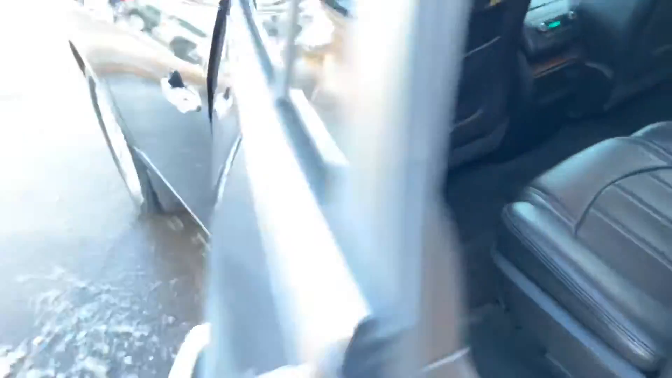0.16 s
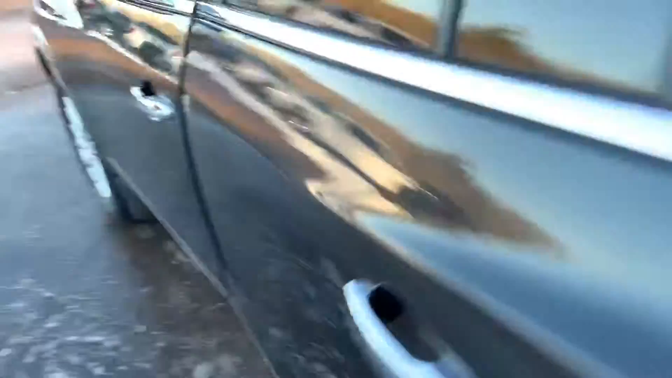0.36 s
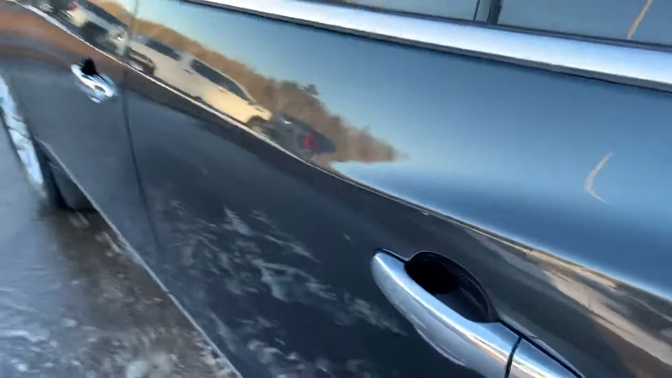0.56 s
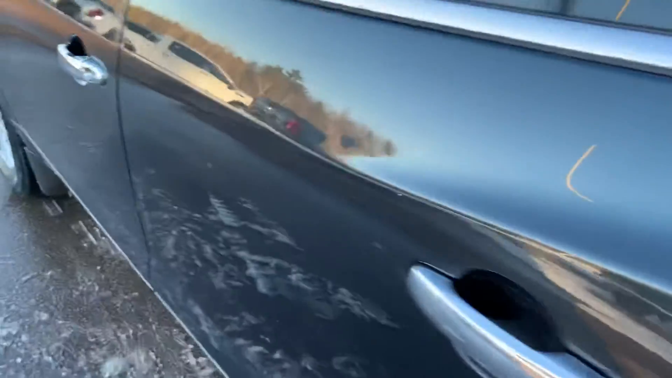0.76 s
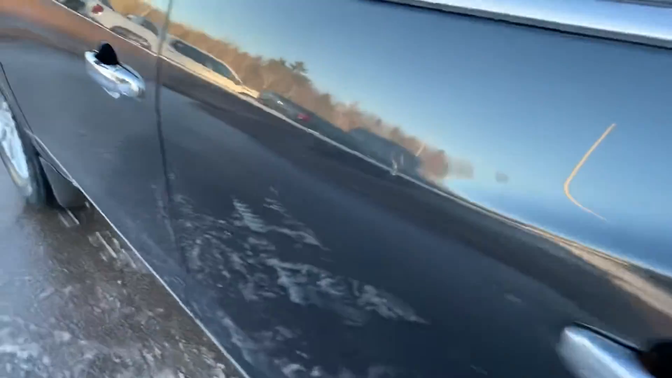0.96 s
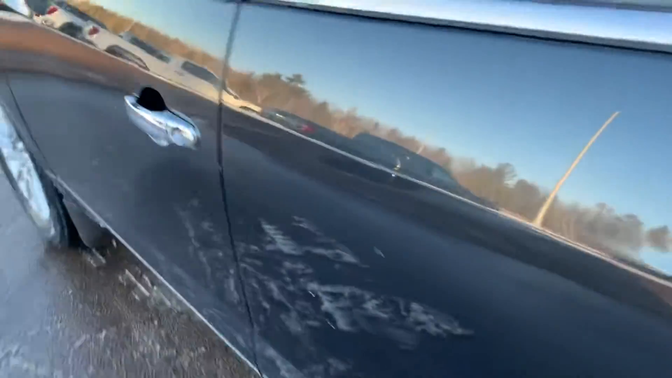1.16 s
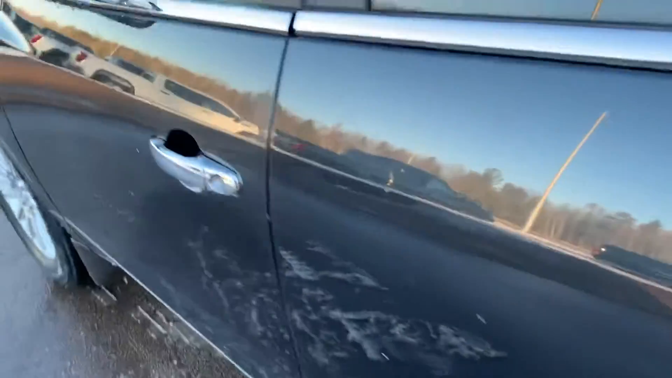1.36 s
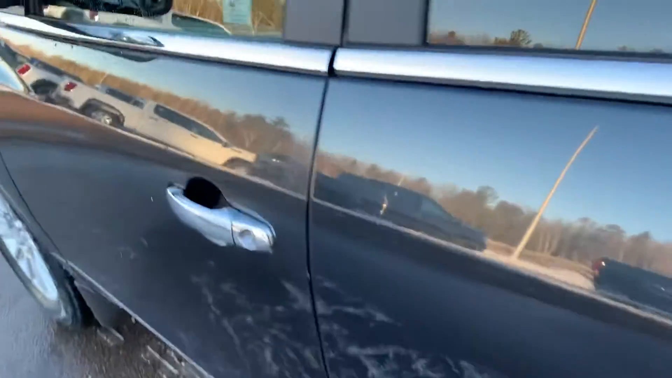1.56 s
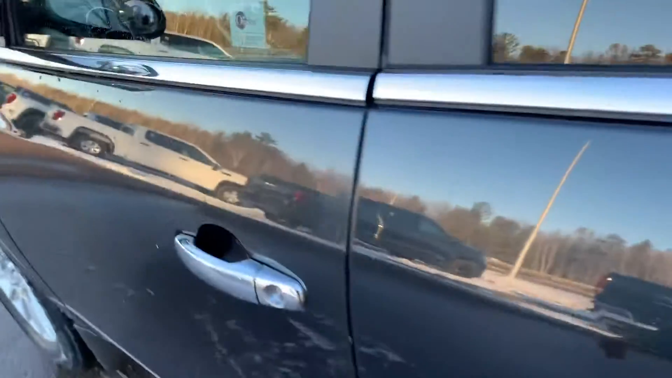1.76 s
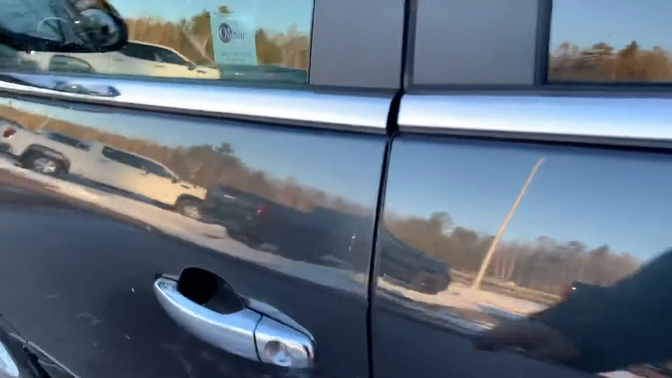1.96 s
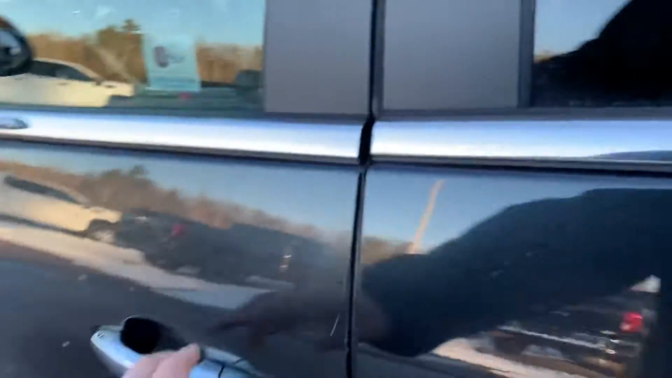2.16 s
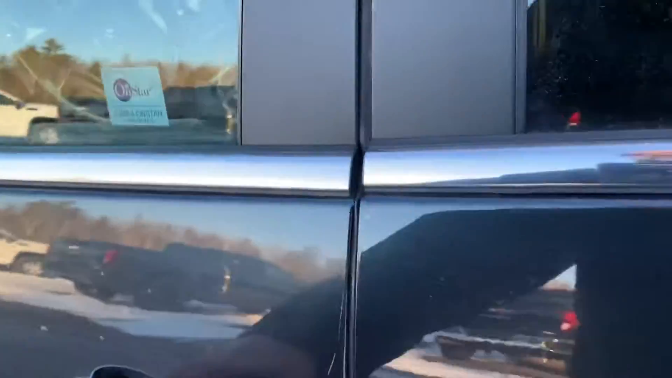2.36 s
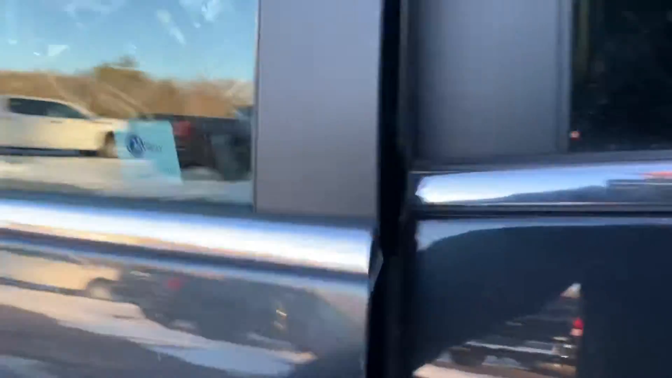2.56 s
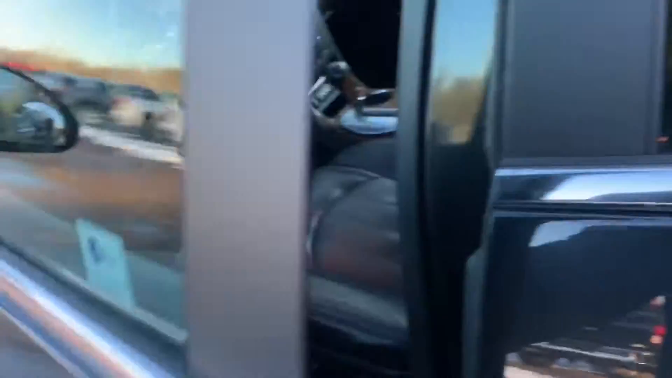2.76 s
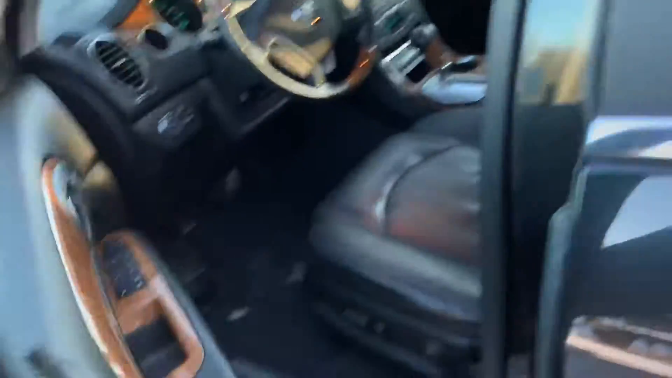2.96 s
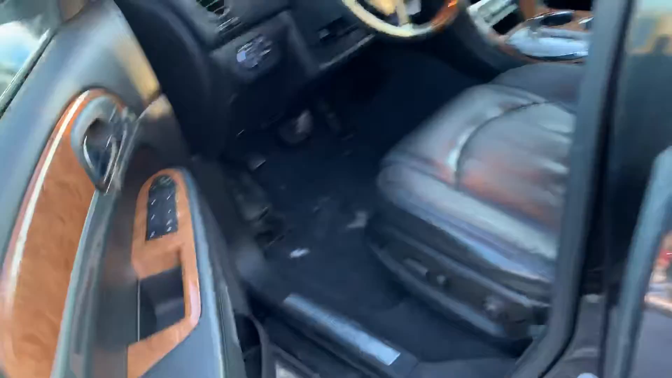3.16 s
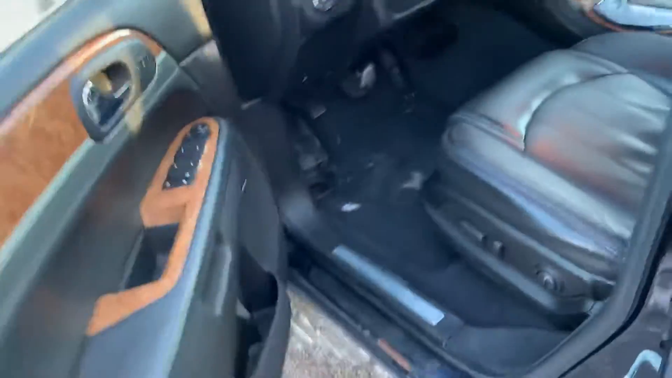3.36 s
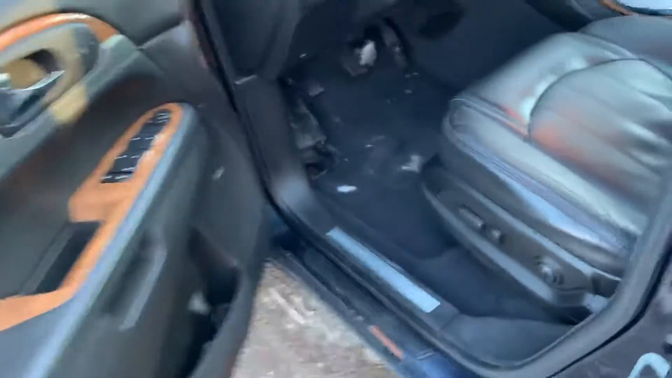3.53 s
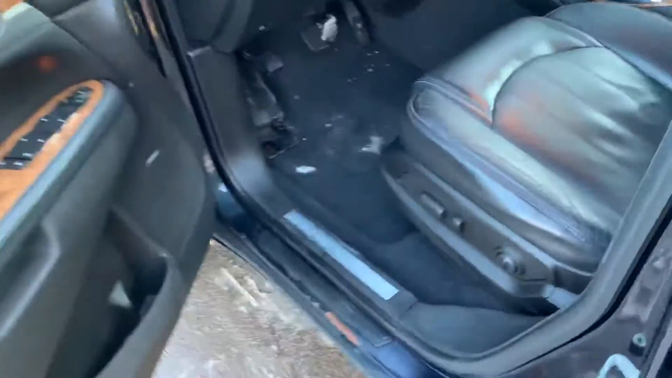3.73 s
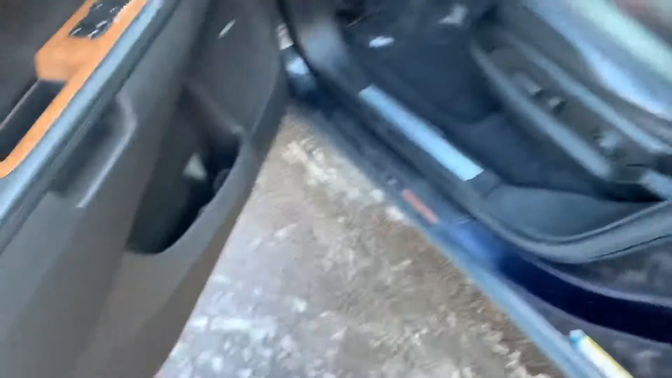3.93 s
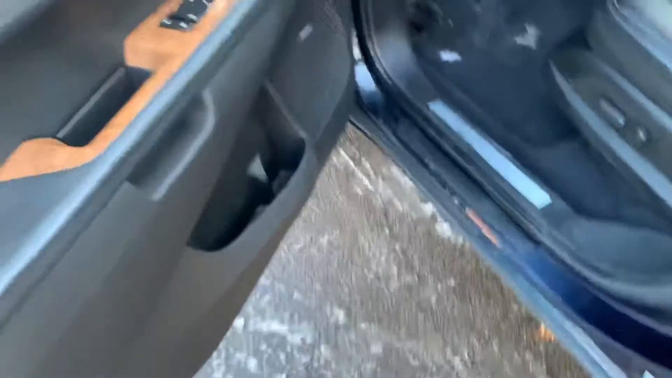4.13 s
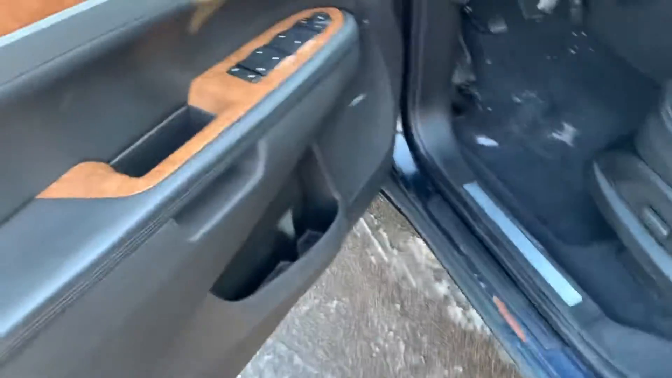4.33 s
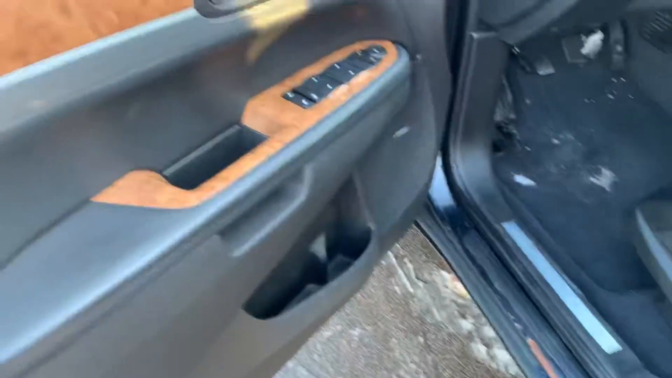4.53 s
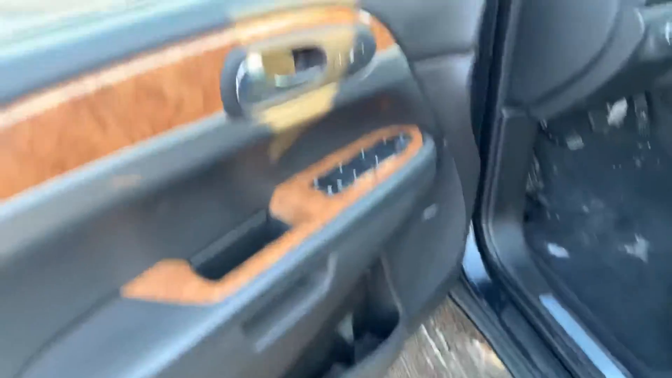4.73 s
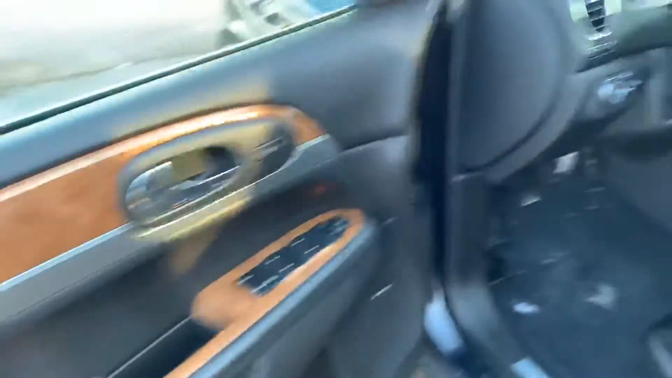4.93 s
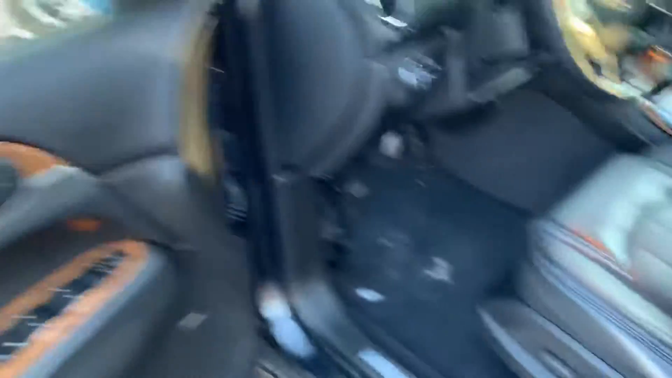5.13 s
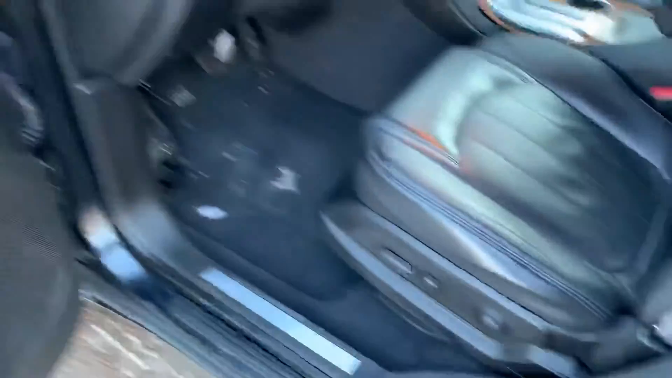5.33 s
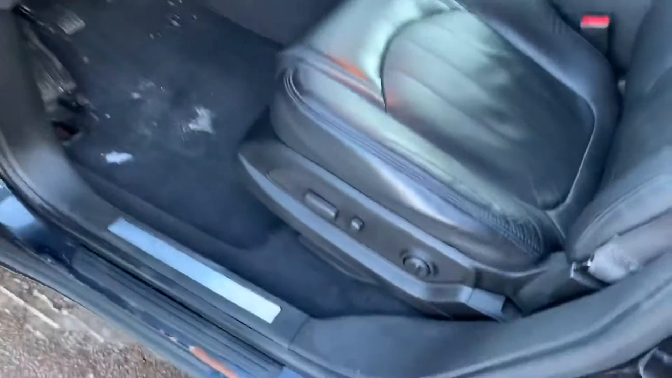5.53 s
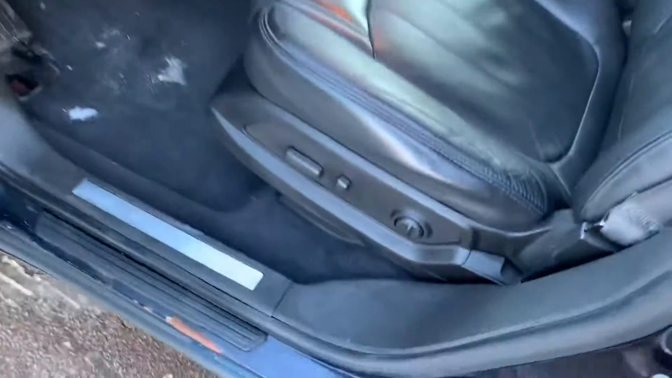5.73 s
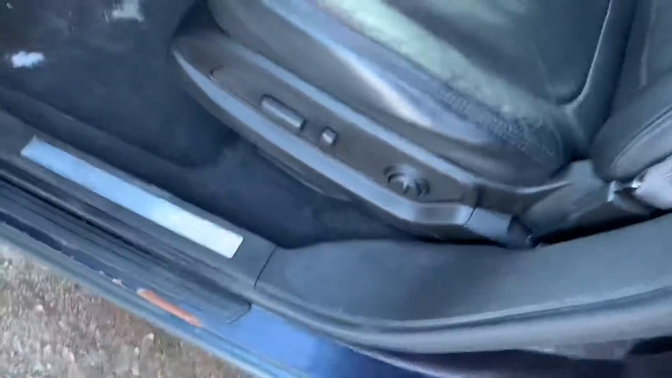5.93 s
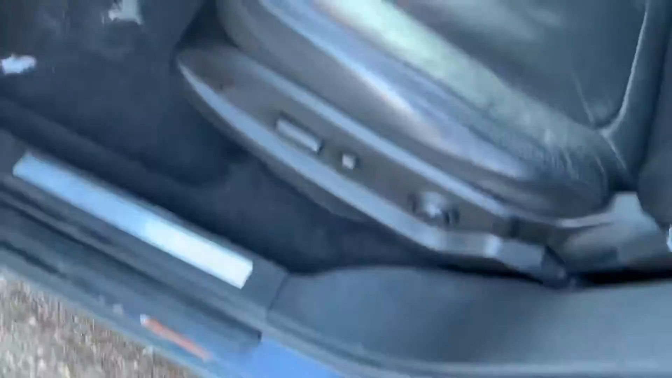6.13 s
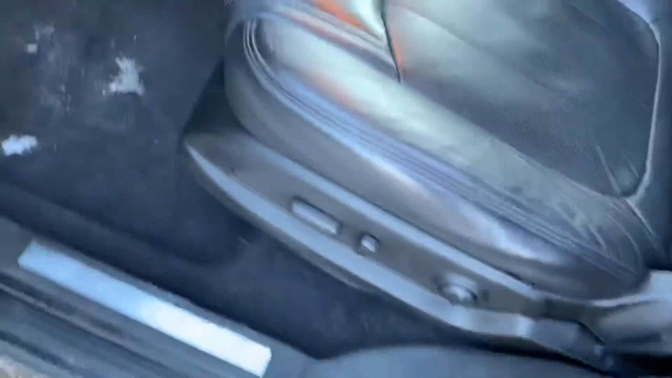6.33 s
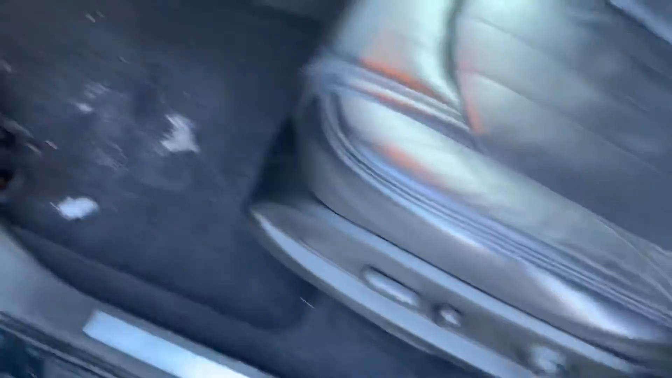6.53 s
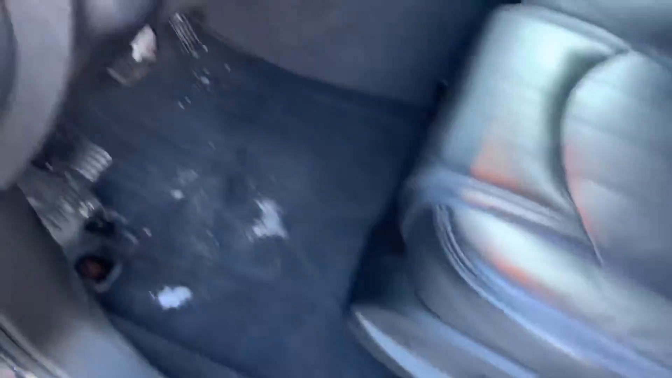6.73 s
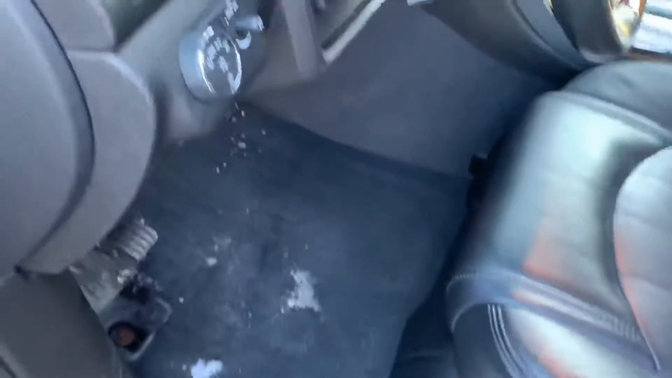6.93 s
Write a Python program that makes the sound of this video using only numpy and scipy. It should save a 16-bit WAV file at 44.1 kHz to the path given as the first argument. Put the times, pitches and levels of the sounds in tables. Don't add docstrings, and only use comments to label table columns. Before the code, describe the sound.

Close car door thump and brief cabin boom, later handle knocks and latch clicks, with ticking keys, rubbing jacket and distant engines idling.

```python
import sys
import numpy as np
from scipy import signal
from scipy.fft import rfft, irfft, next_fast_len
from scipy.io import wavfile
from scipy.ndimage import uniform_filter1d

SR = 44100
rng = np.random.default_rng(int(sys.argv[2]) if len(sys.argv) > 2 else 0)


def volts(x):
    e = np.asarray(x, float) / 20
    return 10 ** e


def dump(signal):
    limited = np.clip(np.atleast_2d(signal).T, -1, 1)
    pcm = np.round(limited * 32767).astype(np.int16)
    wavfile.write(sys.argv[1], SR, pcm)


N = 312357
M = next_fast_len(N)
HZ = np.fft.rfftfreq(M, 1 / SR)

# start in seconds, clatter in dB, thud in dB, crack in dB.
SLAM_BLOWS = [(0.489, -15, -18, -41), (0.494, -13, -22, -44), (0.498, -9, -14.5, -57),
              (0.505, -7, -6.5, -26), (0.511, -16.5, -8.5, -16), (0.516, -12.5, -15, -32),
              (0.523, -27, -20, -29), (0.533, -13.5, -12, -46), (0.54, -24, -11.5, -42),
              (0.547, -25, -13.5, -43), (0.553, -31, -15.5, -52), (0.565, -19.5, -20, -58),
              (0.582, -30, -28, -52), (0.603, -35.5, -28, -54)]
HANDLE_BLOWS = [
    (2.397, -26.5, -45, -38),
    (2.415, -31, -22.5, -56),
    (2.432, -38, -21, -52),
    (2.444, -34, -24, -47),
    (2.462, -22, -12.5, -44),
    (2.466, -18, -16.5, -42),
    (2.483, -26, -21.5, -56),
    (2.493, -40, -25, -58),
    (2.505, -43, -23, -57),
    (2.523, -34, -25, -51),
]
LATCH_BLOWS = [
    (2.553, -34, -30, -56),
    (2.561, -39, -40, -42),
    (2.574, -21.5, -37, -57),
    (2.58, -20, -43, -38),
    (2.584, -21, -22, -32),
    (2.593, -22, -22.5, -39),
    (2.809, -37, -31, -62),
]
CHECK_BLOWS = [
    (2.92, -32, -47, -46),
    (2.926, -14, -43, -23.5),
    (2.932, -14.5, -31, -35),
    (2.938, -22.5, -25.5, -46),
]

# pitch in Hz, level in dB, time to fade by 60 dB in seconds.
PANEL_MODES = [(117.7, -5.5, 0.28), (146, -3, 0.12), (171, -7.5, 0.093), (203, -3.5, 0.083),
               (262, 1, 0.068), (331, -2.5, 0.117), (387, -8, .05), (448, 0.5, 0.033), (560, -2, 0.025),
               (610, 5, 0.042), (834, -15, 0.023), (960, 4, 0.023), (1265, -2, 0.031), (1460, 5, 0.02),
               (1610, -4, .018), (1710, -10, 0.03), (2124, -6, 0.038), (2600, -9, 0.015), (3150, -13, .012),
               (3750, -5.5, 0.018), (4300, -10.5, 0.014)]
LEVER_MODES = [(131.4, 0.5, 0.25), (150, -7, 0.11), (197, -4, 0.13), (232, -2, 0.083), (298.6, -5, 0.19),
               (352, -6, 0.068), (498, -6.5, .04), (745, 5, 0.021), (990, 0, .02), (1280, -5, .015),
               (1630, -18, 0.012), (2980, -10, 0.01)]
PAWL_MODES = [(182.4, 1.5, 0.11), (298, -3.5, .04), (643, -8, 0.028), (1037, -0.5, 0.038),
              (1130, -6, 0.012), (1450, -3.5, 0.014), (2060, -4.5, 0.025), (3000, -17, .012),
              (3940, -24, 0.016), (6740, -25, 0.0052)]
STRAP_MODES = [(197, 2.5, 0.17), (318, 2, 0.088), (463, -17, 0.046), (640, -8, 0.084), (960, -2.5, 0.03),
               (1150, -3, 0.025), (1530, 1, 0.012), (1920, 1.5, 0.012), (2520, -7, 0.006),
               (6620, -7.5, 0.009)]

# start in seconds, level in dB.
AIR_PUSHES = [
    (0.521, -9),
    (0.5737, -7),
]

# start in seconds, ring in dB, ring pitch in Hz, crack in dB.
KEY_TICKS = [(0.0542, -44, 3470, -52), (0.07, -35, 3600, -40), (0.095, -36, 3660, -43),
             (0.125, -38, 3820, -41), (0.14, -38, 3450, -41.5), (0.977, -69, 3770, -44.5),
             (1.638, -41, 3010, -54), (2.1865, -31.5, 3320, -49), (2.2168, -34.5, 3380, -62),
             (2.222, -39, 3450, -50), (2.23, -35, 3450, -46), (2.241, -35, 3600, -49),
             (2.249, -36, 3890, -46), (2.26, -38, 3720, -43), (2.272, -33, 3420, -34.5),
             (2.2824, -32.5, 3700, -41), (2.29, -27.5, 3620, -37), (2.3986, -50, 3960, -41),
             (3.6504, -48, 4010, -57), (3.764, -34, 3560, -50), (5.9, -47, 3670, -53),
             (5.9433, -38, 3140, -47), (6.2914, -52, 3640, -54), (6.582, -34, 3310, -42)]

# loudest moment in seconds, swell in seconds, fade in seconds, level in dB,
# duller rubbing in dB relative to that level.
JACKET_RUBS = [(.255, .015, 0.21, -56, -1), (.385, 0.14, .03, -56.5, -1), (.78, 0.013, .08, -56, -5),
               (.85, .06, .03, -60.5, -4), (1.058, .1, 0.048, -54.5, 2.5), (1.17, 0.13, 0.14, -61, 4),
               (1.65, .015, 0.037, -49.5, -3), (1.688, 0.029, 0.044, -50.5, 7),
               (1.735, 0.049, 0.044, -54, 6), (1.85, 0.11, 0.035, -53, -1), (2.101, 0.0088, 0.056, -42, 4),
               (2.126, 0.037, 0.064, -41.5, -1.5), (2.275, 0.033, 0.17, -54, 5.5),
               (2.404, .025, .02, -60, -2), (2.46, 0.027, .025, -54, -8), (3.36, .09, 0.16, -53.5, 4.5),
               (5.77, 0.032, 0.042, -42, 1), (5.818, 0.036, 0.04, -49, 5.5), (6.04, 0.17, 0.26, -55.5, 2.5),
               (6.294, .015, .015, -57, 0), (6.52, 0.022, 0.023, -52, 1), (6.59, 0.017, 0.074, -52.5, 7.5),
               (6.68, 0.11, 0.32, -63, 9), (6.994, 0.094, 0.065, -54, 0)]

# frequency in Hz, level in dB.
CLOTH_BRIGHT = [(5000, -12), (8000, 4), (12000, 6.5), (16000, 6)]
CLOTH_DULL = [(600, 7.5), (1100, -6), (1500, 5), (2900, -1.5), (3650, -10), (4400, -5), (6500, -8),
              (9000, -9)]

# frequency in Hz, level in dB.
ENGINE_BEAT = [(10, -38), (30, -9), (50, -9.5), (68, 3), (90, -5), (120, -15)]
ENGINE_RUMBLE = [(70, -11), (100, 2), (160, 0), (200, -6.5), (260, -33)]
ENGINE_DRONE = [(170, -7.5), (220, 1), (320, -3.5), (420, -10), (600, -12.5), (800, -12.5)]
TYRE_ROAR = [(400, -14), (600, -7), (800, -5), (930, 0), (1060, -5), (1400, -14)]
ROAD_SPRAY = [(900, -3.5), (1350, 5.5), (2000, -1), (2700, -6), (3500, -11.5), (5000, -20.5), (7000, -28)]
FAR_HISS = [(2500, -1), (5000, 2), (7500, 0.5), (8300, 2), (12000, -3), (16000, -1.5)]

# time in seconds, openness from 0 to 1.
CABIN_OPENING = [(0, 0.65), (.3, 0.38), (.55, 0.25), (1.3, 0), (2.3, 0.45), (2.6, 0.28), (3.1, 1),
                 (3.65, 0.9), (4.0, 0.84), (5.2, 0.75), (5.7, 0.82), (7.08, 1)]
# time in seconds, effort in dB.
ENGINE_EFFORT = [(0, -2), (.4, -1), (.8, 1.5), (1.3, 1.5), (1.65, 0.5), (2.1, -1), (2.7, 0), (3.3, -1),
                 (3.6, 0), (4.0, -3.5), (4.35, 1.5), (4.75, -3.5), (5.3, -0.5), (5.95, 1), (6.3, 0),
                 (6.65, 1.5), (7.08, 1.5)]
# time in seconds, swell in dB.
TRAFFIC_SWELL = [(0, -1), (.7, 2), (1.2, 0.5), (1.8, 0), (2.05, -1), (2.27, 3), (2.6, -1.5), (3.1, 1),
                 (3.6, 1.5), (3.9, 1), (4.3, 0), (4.75, -1), (5.3, 0.5), (5.9, 0.5), (6.25, 0.5),
                 (6.7, 3.5), (7.08, 0.5)]

# frequency in Hz, likeness from 0 to 1.
PORT_LIKENESS = [(60, .96), (300, .9), (600, .2), (1300, .25), (5700, .22), (7900, .985), (16000, .993)]
# frequency in Hz, turns of phase by which the right port leads.
RIGHT_PORT_LEAD = [(0, 0), (350, .04), (600, -.2), (5700, -2.6), (6250, -3), (7950, -2.55), (8950, -2.45),
                   (10450, -2.05), (11550, -1.95), (12600, -1.55), (14000, -1.45), (15200, -1.04),
                   (22050, -.9)]
# frequency in Hz, level of the right port in dB.
RIGHT_PORT_LEVEL = [(100, 0.73), (1000, -1.33), (4000, 2.5), (7500, 2.0)]


def slammed_door():
    return blows(SLAM_BLOWS, PANEL_MODES, 0.004, -8.0, -3.5, 4.5, 1500)


def cabin_boom():
    push = np.zeros(N)
    for start_s, db in AIR_PUSHES:
        push[int(start_s * SR)] = volts(db)
    return uniform_filter1d(ring(push, hz=60, t60_s=0.23), size=60)


def pulled_handle():
    return blows(HANDLE_BLOWS, LEVER_MODES, 0.0067, -5.5, -4.5, -14, 1800)


def released_latch():
    return blows(LATCH_BLOWS, PAWL_MODES, 0.0049, 0, 0.5, 3.8, 1500)


def snapping_check():
    return blows(CHECK_BLOWS, STRAP_MODES, 0.002, -3.0, -1.2, 4.4, 1300)


def keys():
    out = np.zeros((2, N))
    tick_s = 0.004
    for start_s, ring_db, hz, crack_db in KEY_TICKS:
        crack = volts(crack_db + 7.5) * burst(tick_s, 3900)
        tone = volts(ring_db - 11.5) * ring(burst(tick_s, 2800), hz, t60_s=0.0084)
        add(out, crack + tone, start_s)
    return out


def jacket():
    edge_db, roundness = 17.5, 1.44
    near_share = 0.9
    t = np.arange(N) / SR
    bright_level, dull_level = np.zeros(N), np.zeros(N)
    for peak_s, swell_s, fade_s, db, dull_db in JACKET_RUBS:
        before = (peak_s - t) / max(swell_s, 0.004)
        after = (t - peak_s) / max(fade_s, 0.004)
        away = np.where(t < peak_s, before, after)
        level = volts(db - edge_db * np.minimum(away, 8) ** roundness)
        bright_level += level
        dull_level += level * volts(dull_db)
    grain = volts(1.7 * walk(300) + 1.26 * walk(60))
    left, own = colour(CLOTH_DULL)
    dull = np.array([left, near_share * left + np.sqrt(1 - near_share ** 2) * own])
    bright = colour(CLOTH_BRIGHT)
    return grain * (bright_level * volts(5.5) * bright + dull_level * volts(4.0) * dull)


def yard():
    opening, engines, traffic = curve(CABIN_OPENING), curve(ENGINE_EFFORT), curve(TRAFFIC_SWELL)
    throb = walk(12)
    swing_db = 8.5 * np.exp(-np.arange(N) / SR / 0.26)

    beat_db = -33 - 5 * opening + 0.98 * engines + 1.5 * throb
    rumble_db = -37 + 3.77 * opening + 0.92 * engines + swing_db + 0.44 * throb
    drone_db = -47 + 11.3 * opening + 0.42 * engines + 0.67 * throb + 0.71 * walk(9.3)
    roar_db = -41 - 3.5 * opening + traffic + 1.0 * throb + 0.67 * walk(12.0)
    spray_db = -48.5 + 5.77 * opening + 0.73 * traffic + 0.79 * throb + 0.74 * walk(9)
    hiss_db = -58 + 5.4 * opening + 0.37 * traffic + 0.11 * walk(5.9)

    out = volts(beat_db) * colour(ENGINE_BEAT)
    out += volts(rumble_db) * colour(ENGINE_RUMBLE)
    out += volts(drone_db) * colour(ENGINE_DRONE)
    out += volts(roar_db) * colour(TYRE_ROAR)
    out += volts(spray_db) * colour(ROAD_SPRAY)
    return out + volts(hiss_db) * colour(FAR_HISS)


def blows(events, modes, length_s, clatter_db, thud_db, crack_db, crack_hz):
    out = np.zeros((2, N))
    for start_s, high_db, low_db, bright_db in events:
        chatter = burst(length_s, 33)
        push = np.zeros((2, SR // 7))
        push[:, :chatter.shape[1]] = chatter / np.sqrt(np.sum(chatter ** 2, axis=1, keepdims=True))
        for hz, db, t60_s in modes:
            pitch_change, level_change = rng.standard_normal(2)
            strength_db = low_db + thud_db if hz < 500 else high_db + clatter_db
            tone = ring(push, hz * (1 + 0.062 * pitch_change), t60_s)
            add(out, volts(db + 2 * level_change + strength_db) * tone, start_s)
        add(out, burst(length_s, crack_hz) * volts(bright_db + crack_db), start_s)
    return out


def burst(length_s, low_hz):
    t = np.arange(SR // 20) / SR
    steps = volts(4 * rng.standard_normal(len(t) // 15 + 1))
    grit = rng.standard_normal((2, len(t))) * np.repeat(steps, 15)[:len(t)]
    high_pass = signal.butter(2, low_hz, "high", fs=SR, output="sos")
    x = signal.sosfilt(high_pass, grit)
    return x * np.exp(-t / max(length_s, 0.0005)) * np.minimum(t / 0.0014, 1)


def ring(x, hz, t60_s):
    pole = np.exp((2j * np.pi * hz - np.log(1000) / t60_s) / SR)
    return signal.lfilter([1], [1, -pole], x).imag


def add(out, x, start_s):
    i = int((start_s + 0.0005) * SR)
    out[:, i:i + x.shape[1]] += x[:, :N - i]


def colour(points):
    hz, db = np.transpose(points)
    gain = volts(np.interp(np.log(HZ + 1), np.log(hz), db, left=-120, right=-120))
    x = irfft(rfft(rng.standard_normal((2, M))) * gain, M)[:, :N]
    return x / np.std(x)


def walk(rate_hz):
    k = int(SR / rate_hz)
    steps = np.repeat(rng.standard_normal(N // k + 1), k)
    return 1.3 * uniform_filter1d(uniform_filter1d(steps, k), k)[:N]


def curve(rows):
    return np.interp(np.arange(N) / SR, *np.transpose(rows))


def scene():
    door = slammed_door() + cabin_boom()
    front_door = pulled_handle() + released_latch() + snapping_check()
    return door + front_door + keys() + jacket() + yard()


def low_pass(x):
    return signal.sosfilt(signal.butter(12, 16800, fs=SR, output="sos"), x)


def record(dry):
    left, own = rfft(dry, M) * (HZ < 15850)
    like_hz, like_value = np.transpose(PORT_LIKENESS)
    like = np.clip(np.interp(np.log(HZ + 1), np.log(like_hz), like_value), 0, 1)
    turn = np.exp(2j * np.pi * np.interp(HZ, *np.transpose(RIGHT_PORT_LEAD)))
    right = like * turn * left + np.sqrt(1 - like ** 2) * turn * own
    right *= volts(np.interp(HZ, *np.transpose(RIGHT_PORT_LEVEL)))

    treble = right * (HZ > 6000)
    wander = 0.27 * walk(17)
    parts = np.array([left, right - treble, treble, 1j * treble])
    left, low, high, quarter_turn = irfft(parts, M)[:, :N]
    right = low + np.cos(wander) * high + np.sin(wander) * quarter_turn
    both = np.array([left, right])
    both = both / (1 + (both / 0.95) ** 4) ** 0.25
    return low_pass(both)


dry = scene()
out = record(dry)
dump(out)
```